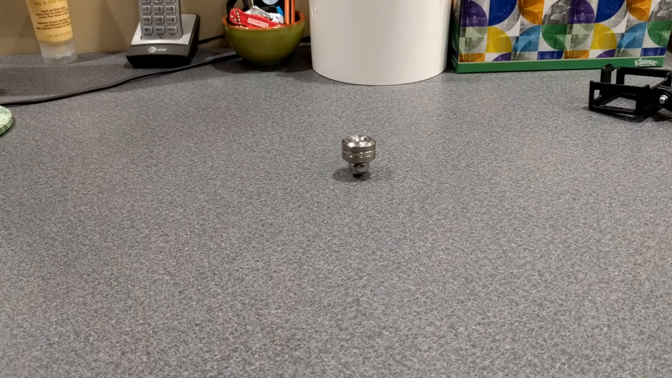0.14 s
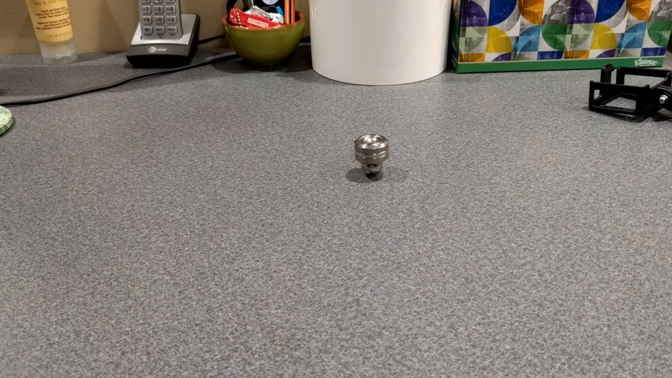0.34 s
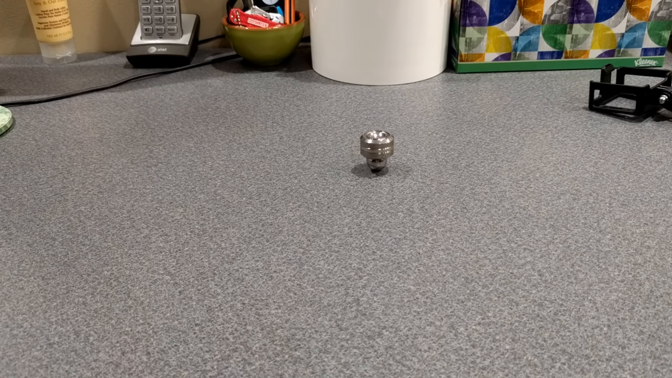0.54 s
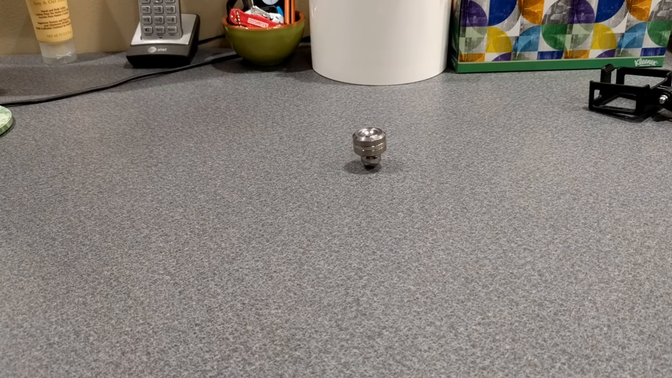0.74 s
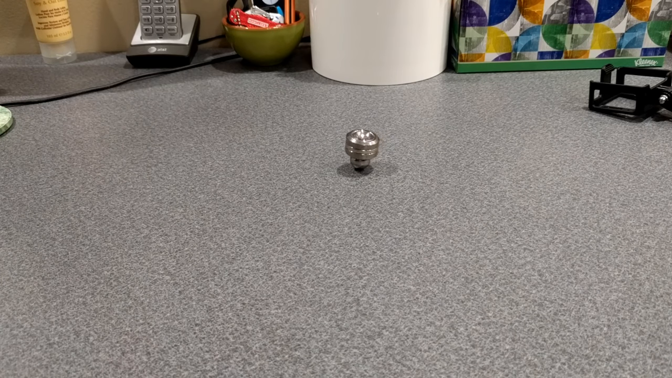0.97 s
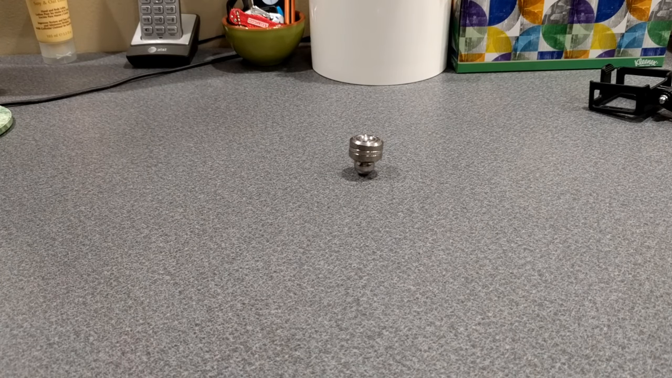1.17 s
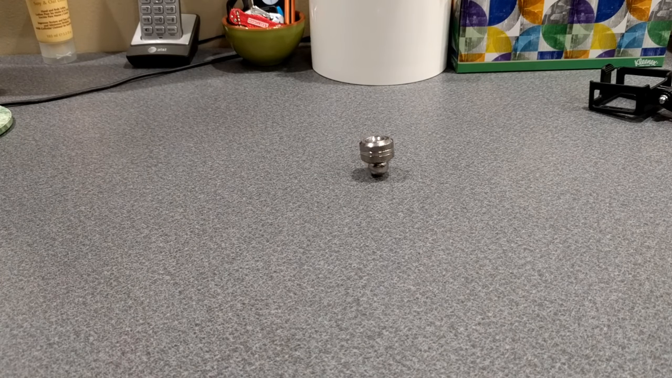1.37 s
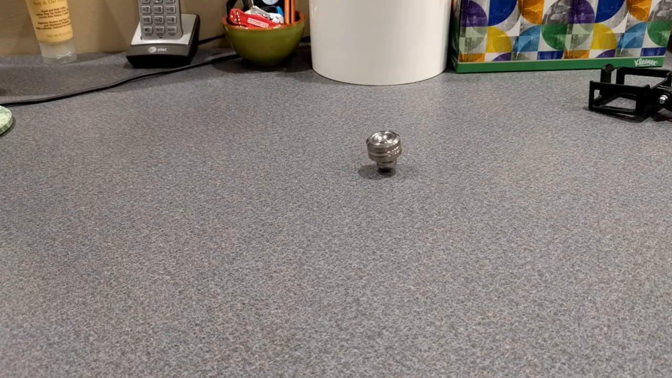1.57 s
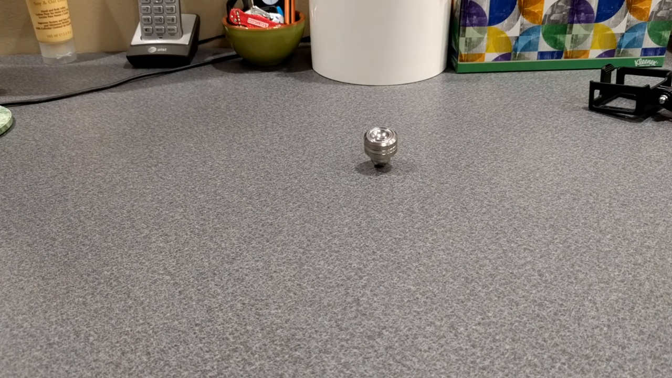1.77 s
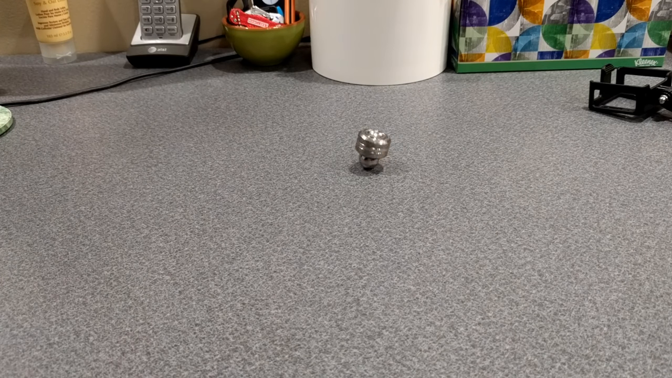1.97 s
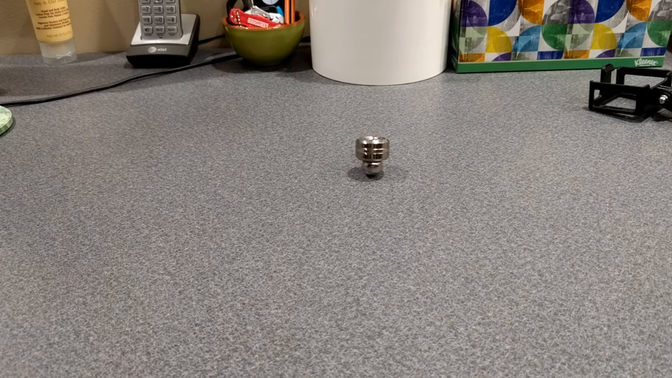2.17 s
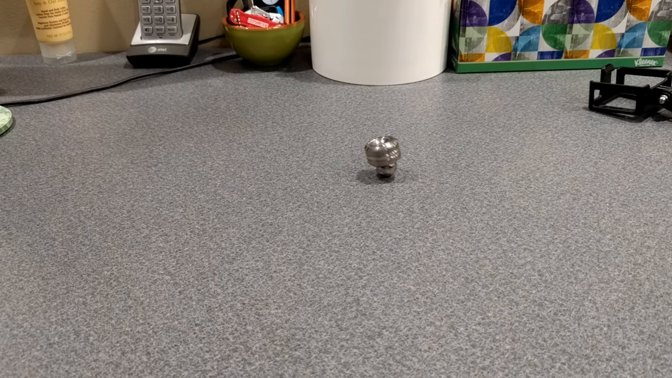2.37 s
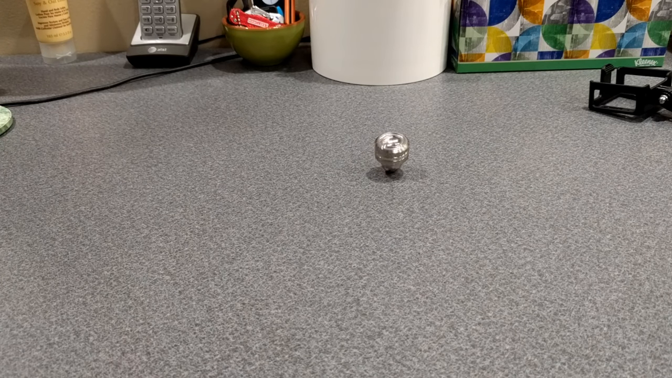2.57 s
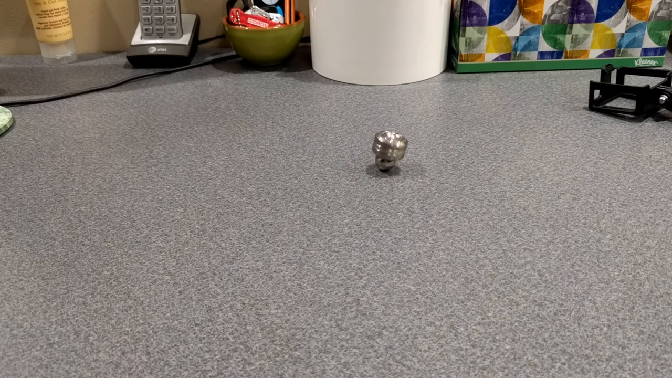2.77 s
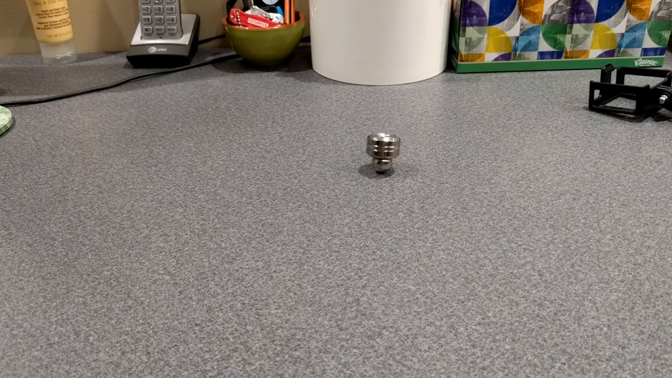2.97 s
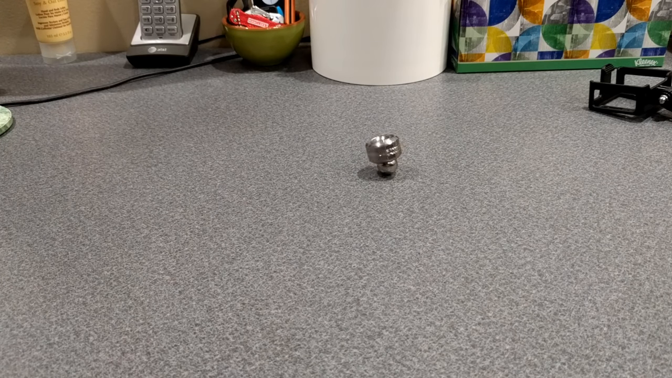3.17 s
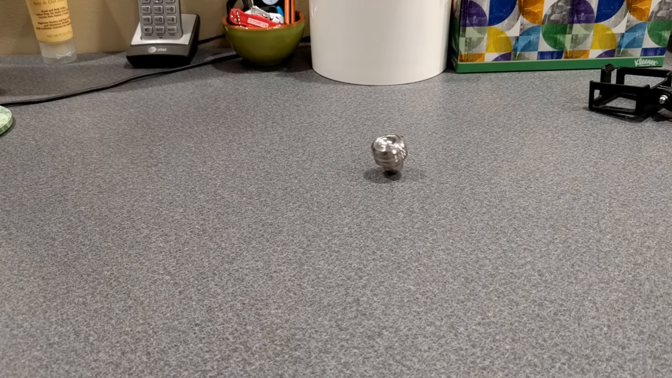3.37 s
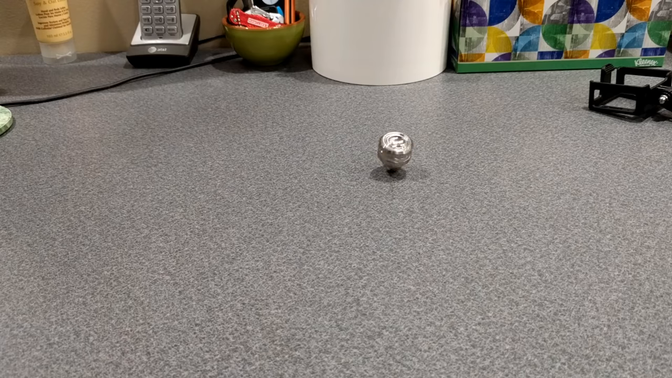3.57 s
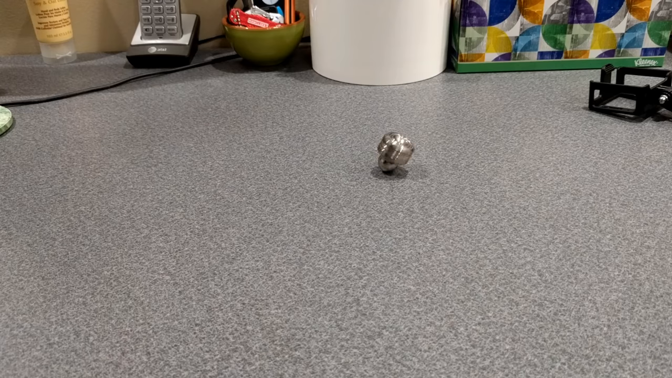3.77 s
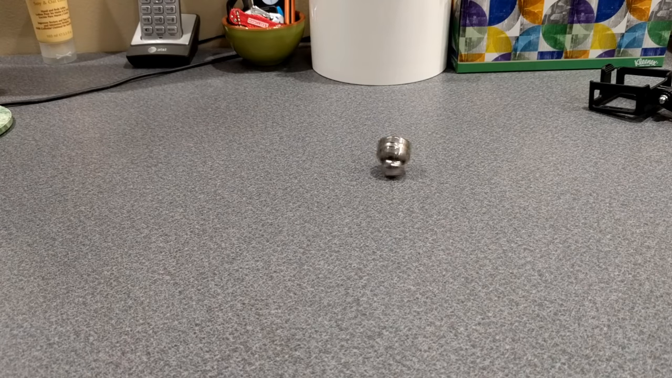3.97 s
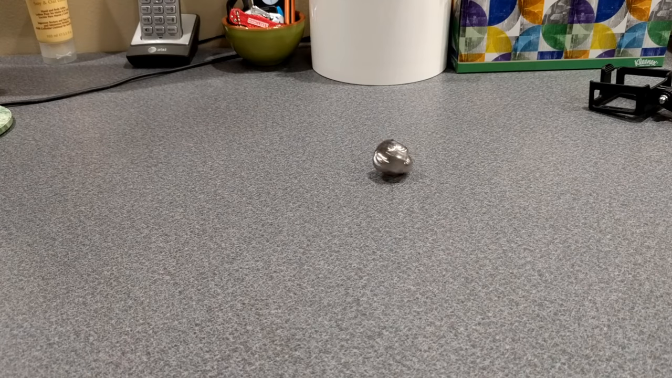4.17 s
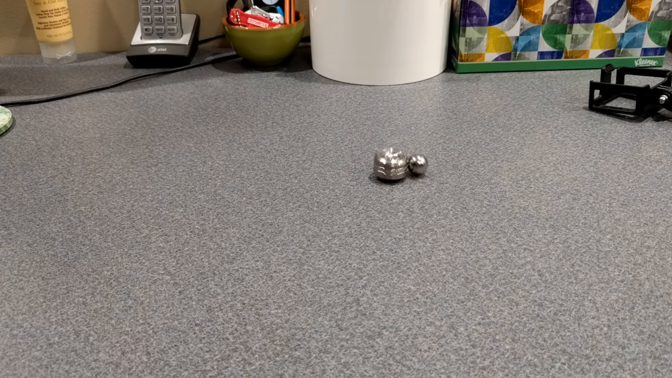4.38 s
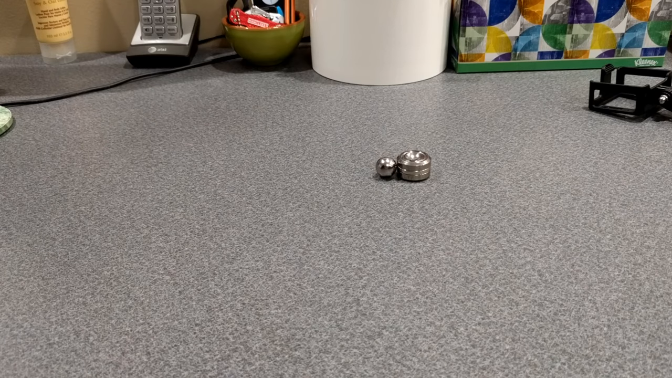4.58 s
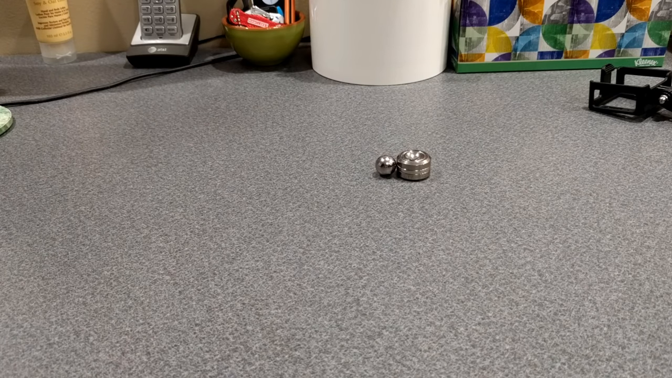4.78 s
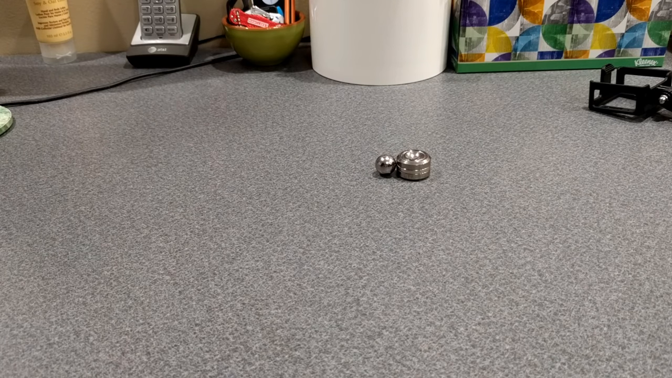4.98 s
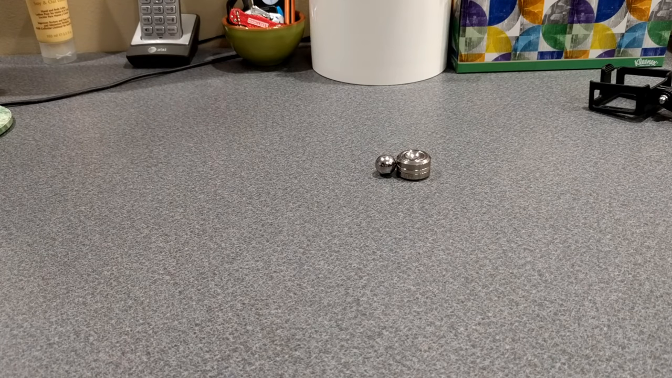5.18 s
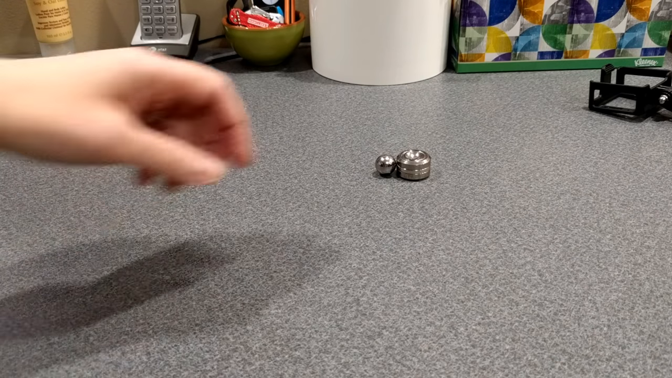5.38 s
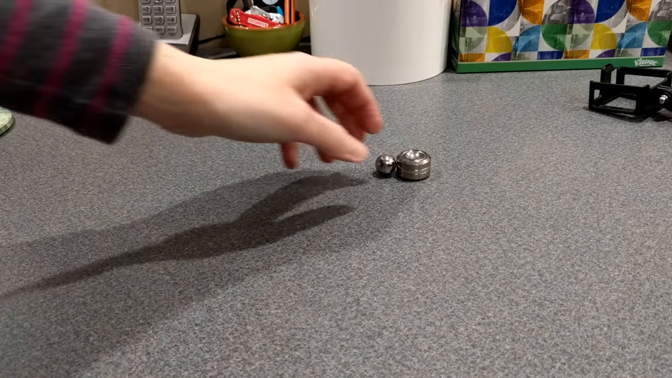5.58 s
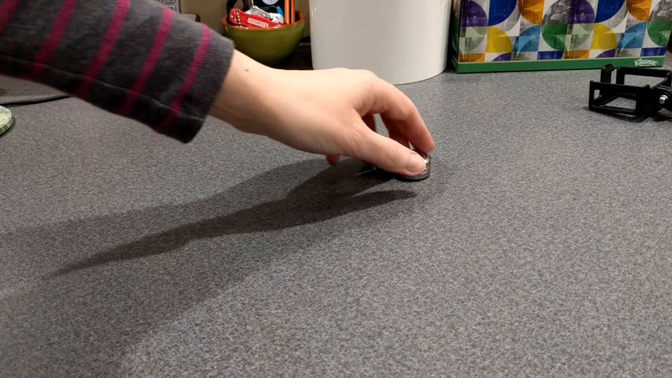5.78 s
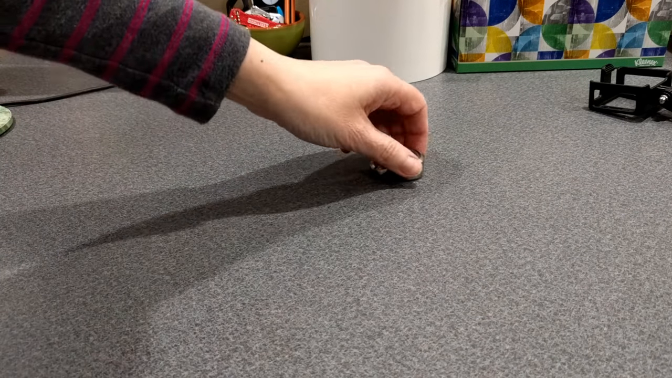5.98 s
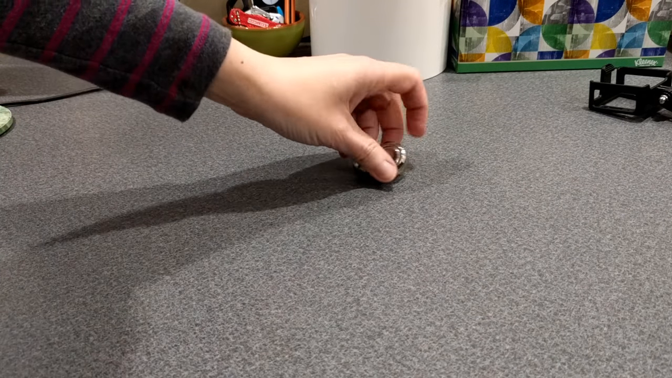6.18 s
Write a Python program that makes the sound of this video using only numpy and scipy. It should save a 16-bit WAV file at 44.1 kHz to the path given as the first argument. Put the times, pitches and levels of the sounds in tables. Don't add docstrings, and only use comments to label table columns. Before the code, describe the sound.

A quiet, dry kitchen with low fridge hum, soft hiss and very high, tiny electrical ticks throughout. From 0 seconds a small steel top spins on a laminate counter, barely audible: a faint grainy whirr swelling about five times a second. From about 2 seconds the wobble pulses grow, with small scratchy skids and occasional light metal clicks. By 3 to 3.7 seconds it is a clear rhythmic scrape, and from 3.8 it turns into a coarse, heavy rolling rattle. At about 4.26 it topples: very loud, sharp knocks on the counter with bright steel clacks, crowded together until 4.47, then a quick rocking rattle fading by 4.6. Only room tone remains until a brief soft sleeve rustle around 5.1 to 5.4. From 5.7 fingers touch the pieces with faint taps; between 5.95 and 6.2 come short scrapes, duller knocks and small metallic clicks as it is lifted.

```python
import sys
import numpy as np
from scipy import signal
from scipy.fft import rfft, irfft, next_fast_len
from scipy.io import wavfile

SR = 44100
rng = np.random.default_rng(int(sys.argv[2]) if len(sys.argv) > 2 else 0)


def to_wav(s):
    ch = np.atleast_2d(s).T
    pcm = np.round(np.clip(ch, -1, 1) * 32767)
    wavfile.write(sys.argv[1], SR, pcm.astype(np.int16))


def ratio_of_db(decibels):
    return 10 ** (np.asarray(decibels, float) / 20)


N = 274743
SIZE = next_fast_len(N + SR)
HZ = np.arange(SIZE // 2 + 1) * SR / SIZE + 1e-3
T_S = np.arange(N) / SR

# (frequency [Hz], density [dB per Hz])
AIR_SPECTRUM = [(20, -40), (50, -14.5), (90, -11.5), (170, -9.5), (300, -19), (600, -18.5), (2200, -28.5),
                (9800, -31.5)]
# (frequency [Hz], density [dB per Hz])
HISS_SPECTRUM = [(9800, -9.5), (11500, -2), (16000, -6)]
# (frequency [Hz], level [dB rms], width [Hz])
FRIDGE_LINES = [(59.2, -67, 2.5), (163.5, -70.5, 8.8), (306, -76, 3.6), (720, -81, 2.3), (1990, -79, 3.0),
                (2191, -82.5, 3.0), (2280, -84, 2.7)]
# (time [s], rate [ticks per s], level [dB])
TICK_TRAIN = [(0.0, 21.03, -49.5), (0.8, 21.03, -47), (1.0, 58, -51), (3.8, 57.5, -50), (4.3, 58, -56.5),
              (6.23, 58, -50)]
# (time [s], peak [dB])
LOUD_TICKS = [(0.044, -42.5), (0.0919, -45), (1.388, -44), (2.025, -45), (2.037, -42), (2.6887, -47),
              (3.7478, -42), (4.5587, -45)]
# (time [s], level [dB])
SLEEVE_RUSTLE = [
    (5.08, -84),
    (5.194, -64.5),
    (5.298, -64),
    (5.336, -88),
    (5.376, -80.5),
    (5.38, -75),
]
# (delay [s], gain [signed ratio])
EDGE_ECHOES = [(.00155, -0.37), (.0037, 0.4), (.0055, -.25), (.0070, -0.091)]
# (frequency [Hz], width [Hz], boost [dB], negative for the dip)
COUNTER_COLOUR = [(720, 150, 5), (944, 77, 13), (1222, 90, 8.5), (1315, 24, 5.5), (1628, 100, 3),
                  (1880, 41, 4), (2170, 120, 3.5), (2847, 230, 4.5), (3330, 150, 6), (3620, 150, -2.5),
                  (3950, 160, 6.5), (4558, 150, 4.5)]
# (frequency [Hz], width [Hz], level [dB])
SLAB_MODES = [(252, 680, -11), (425, 96, 3.5), (576, 84, 2.5), (665, 160, -3)]
# (frequency [Hz], width [Hz], level [dB])
CABINET_MODES = [(88, 60, -4.5), (138, 80, 0.5), (260, 77, -6)]
# (frequency [Hz], width [Hz], boost [dB])
CLACK_MODES = [(4980, 900, 12.5), (6105, 600, 4.5), (7960, 500, 7), (12600, 710, 6), (15500, 2800, 4.5)]
# (frequency [Hz], width [Hz], boost [dB])
CHATTER_MODES = [(2950, 200, 19.5), (3450, 250, 6), (4500, 440, 12.5), (6200, 500, 5)]
# (time [s], peak [dB])
CLACKS = [(2.025, -46), (2.031, -60), (2.034, -44), (2.037, -52), (2.04, -49), (2.045, -55), (3.747, -42),
          (3.76, -41), (3.792, -51), (4.259, -11.5), (4.2743, -11), (4.2853, -9.5), (4.2864, -4.5),
          (4.2875, -4), (4.2905, -16.5), (4.2962, -15), (4.308, -25.5), (4.3482, -33), (4.365, -34),
          (4.387, -36), (4.3905, -31.5), (4.422, -31.5), (4.46, -30), (5.975, -44), (5.988, -41),
          (6.116, -52), (6.134, -52), (6.156, -44)]
# (time [s], force [dB])
LEAN = [(0.0, -78), (1.6, -73), (2.9, -59.5), (3.6, -51.5), (3.78, -40.5), (3.795, -26), (3.83, -38),
        (3.885, -33), (3.945, -28.5), (3.975, -23.5), (4.003, -31.5), (4.055, -25.5), (4.07, -21),
        (4.115, -27), (4.13, -21.5), (4.2, -28), (4.22, -23), (4.25, -30)]
# (peak time [s], force [dB], length [s])
WOBBLES = [(0.043, -61, 0.38), (0.265, -56, 0.12), (0.424, -55.5, 0.15), (0.62, -51.5, 0.11),
           (0.78, -52, 0.11), (0.993, -59, 0.11), (1.163, -53, 0.12), (1.363, -54.5, 0.14),
           (1.531, -48.5, 0.082), (1.746, -51.5, 0.13), (1.941, -45.5, 0.1), (2.131, -45, 0.15),
           (2.326, -42.5, .12), (2.505, -41.5, 0.1), (2.708, -46, 0.13), (2.892, -44, 0.11),
           (3.12, -43, 0.15), (3.31, -45, 0.17), (3.506, -41, 0.17), (3.672, -42, 0.21)]
# (time [s], hardness [octaves])
ROLL_HARDNESS = [
    (0.0, 1.53),
    (1.8, 1.53),
    (2.4, 1.44),
    (3.6, 1.37),
    (3.9, 1.65),
    (4.25, 1.94),
]
# (time [s], peak [dB])
SKIDS = [(0.236, -40), (0.452, -44), (0.75, -40), (0.782, -50), (1.142, -41.5), (1.39, -46), (1.504, -39),
         (1.537, -46), (1.69, -39), (1.934, -39), (2.11, -33.5), (2.139, -45), (2.174, -40.5), (2.27, -40),
         (2.307, -44), (2.484, -34.5), (2.713, -29.5), (2.856, -37), (2.875, -33.5), (3.08, -32),
         (3.107, -28), (3.131, -30.5), (3.251, -37), (3.295, -41), (3.346, -31), (3.454, -37),
         (3.488, -30.5), (3.667, -26), (3.742, -30), (3.759, -24)]
# (time [s], peak [dB], hardness [octaves])
RIM_KNOCKS = [(4.2592, -3.5, 2.35), (4.2636, -8, 2.16), (4.2814, 3, 2.38), (4.2855, -13, 3),
              (4.2898, -7, 2.2), (4.3268, -4.5, 2.3), (4.3366, -15, 2.3), (4.3482, 4, 2.64),
              (4.365, 4, 2.64), (4.377, -15, 6.5), (4.387, 3, 2.78), (4.3903, -6, 4.7), (4.399, -3.5, 2.5),
              (4.405, -8.5, 4.5), (4.4085, -14.5, 1.6), (4.413, -30.5, 2.7), (4.418, -26, 4.2),
              (4.4223, -3, 2.8), (4.433, -13, 3), (4.445, -26, 4.1), (4.458, -14.5, 2.7),
              (4.466, -19, 2.25)]
# (time [s], force [dB], hardness [octaves])
ROCKING = [
    (4.27, -27, 1.9),
    (4.32, -30.5, 1.8),
    (4.401, -26.5, 3.1),
    (4.451, -25.5, 2.6),
    (4.49, -24.5, 2.19),
    (4.53, -35, 2.37),
    (4.57, -52.5, 2.5),
    (4.62, -70, 1.8),
    (4.68, -90, 1.6),
]
# (time [s], force [dB], hardness [octaves])
DRAG = [
    (5.7, -85, 2.3),
    (5.73, -69, 2.9),
    (5.785, -67, 1),
    (5.82, -51, 1.94),
    (5.935, -59, 1.9),
    (5.95, -38, 1.65),
    (6.05, -38, 1.4),
    (6.11, -46.5, 1.5),
    (6.195, -43, 1.04),
]
# (time [s], peak [dB], hardness [octaves])
NUDGES = [(5.721, -48.5, 3.1), (5.737, -57, 2.1), (5.8, -41, 1.4), (5.821, -36, 2), (5.946, -53, 1.4),
          (5.951, -39, 1.6), (5.967, -21.5, 1.2), (5.9794, -26.5, 3.1), (5.9833, -19.5, 1.03),
          (5.995, -29, 0.7), (6.0118, -28, 1.3), (6.032, -22, 1.3), (6.041, -34, 0.81), (6.106, -39, 1.5),
          (6.126, -19, 1.3), (6.133, -25.5, 1.2), (6.1353, -12.5, 2.0), (6.139, -35, 3.3),
          (6.157, -20, 2.1), (6.188, -72, 0.81), (6.191, -26.5, 0.92)]

SOFTEST_HZ = 500
HARDNESS_OCTAVES = np.arange(0, 3.6, .5)


def unit_rms(x):
    return x / np.sqrt(np.mean(x ** 2) + 1e-20)


def in_time(rows):
    s, *columns = np.transpose(rows)
    return [np.interp(T_S, s, c) for c in columns]


def sample_at(rows):
    return (np.array(rows)[:, 0] * SR).astype(int)


def through(x, response):
    return irfft(rfft(x, SIZE) * response, SIZE)[:N]


def noise_through(response):
    return unit_rms(through(rng.standard_normal(N), response))


def clicks(rows):
    out = np.zeros(N)
    np.add.at(out, sample_at(rows), ratio_of_db(np.array(rows)[:, 1]))
    return out


def burst(rows, rise_s, fall_s):
    swell = clicks(rows) + 1e-18
    for s in rise_s, fall_s:
        keep = np.exp(-1 / (s * SR))
        swell = signal.lfilter([1 - keep], [1, -keep], swell)
    return swell * (rise_s + fall_s) * SR


def resonances(modes):
    out = 1
    for hz, width_hz, boost_db in modes:
        damp = 1j * HZ * width_hz
        stiff = hz ** 2 - HZ ** 2
        out = out * (stiff + damp * ratio_of_db(boost_db)) / (stiff + damp)
    return out


def low_pass(hz):
    s = 1j * HZ / hz
    return 1 / ((1 + .77 * s + s * s) * (1 + 1.85 * s + s * s))


def room_tone(split_hz):
    air_db, hiss_db, wander_db = -60.5, -66.5, 1.0
    spectra = []
    for table in AIR_SPECTRUM, HISS_SPECTRUM:
        hz, db = np.transpose(table)
        spectra.append(ratio_of_db(np.interp(np.log(HZ), np.log(hz), db)))
    air = noise_through(spectra[0] * (HZ < split_hz))
    hiss = noise_through(spectra[1] * (HZ >= split_hz) * (HZ < 16000))
    wander = noise_through(1 / (1 + HZ ** 2))
    hum = 0
    for hz, db, width_hz in FRIDGE_LINES:
        hum = hum + ratio_of_db(db) * noise_through(1 / (1 + (2 * (HZ - hz) / width_hz) ** 2))
    return ratio_of_db(air_db) * air + ratio_of_db(hiss_db + wander_db * wander) * hiss + hum


def ticks(low_hz):
    first_s, spread_db, jitter_s = .0345, 2, 0.0024
    per_s, db = in_time(TICK_TRAIN)
    turns = np.cumsum(per_s) / SR - first_s * per_s[0]
    at = np.flatnonzero(np.diff(np.floor(turns)))
    late, loud = rng.standard_normal((len(at), 2)).T
    jittered = at / SR > TICK_TRAIN[1][0]
    s = np.clip(at / SR + jitter_s * late * jittered, 0, (N - 1) / SR)
    rows = list(zip(s, db[at] + spread_db * loud)) + list(LOUD_TICKS)
    band = signal.butter(4, [low_hz, 15700], "band", fs=SR, output="sos")
    return ratio_of_db(3.0) * signal.sosfilt(band, burst(rows, .0002, 0.00059) * rng.standard_normal(N))


def sleeve():
    band = signal.butter(2, [2400, 10000], "band", fs=SR, output="sos")
    before, after = (SLEEVE_RUSTLE[0][0] - .02, -110), (SLEEVE_RUSTLE[-1][0] + .02, -110)
    level_db = in_time([before] + list(SLEEVE_RUSTLE) + [after])[0]
    return ratio_of_db(level_db) * unit_rms(signal.sosfilt(band, rng.standard_normal(N)))


def kitchen(near_t60_s, near_db, near_hz, t60_s, wet_db, dull_hz):
    t = np.arange(SR) / SR
    tails = []
    for decay_s, start_s in (near_t60_s, .001), (t60_s, .008):
        tail = rng.standard_normal(SR) * ratio_of_db(-60 * t / decay_s) * np.clip(t / start_s - 1, 0, 1)
        tails.append(rfft(tail / np.sqrt(np.sum(tail ** 2)), SIZE) / (1 + 1j * HZ / dull_hz))
    s = 1j * HZ / near_hz
    return 1 + ratio_of_db(near_db) * tails[0] * (s / (1 + s)) ** 2 + ratio_of_db(wet_db) * tails[1]


def echoes():
    return 1 + sum(gain * np.exp(-2j * np.pi * HZ * s) for s, gain in EDGE_ECHOES)


def counter(blows, grains, hardness, cut_hz):
    board = resonances(COUNTER_COLOUR) * low_pass(cut_hz) * echoes()
    out = 0
    for octave in HARDNESS_OCTAVES:
        s = 1j * HZ / (SOFTEST_HZ * 2 ** octave)
        response = -s ** 3 / (1 + s) ** 8 * board
        pulse = irfft(response, SIZE)
        share = np.clip(1 - 2 * np.abs(hardness - octave), 0, 1)
        force = blows / np.max(np.abs(pulse)) + grains / np.sqrt(np.sum(pulse ** 2))
        out = out + rfft(share * force, SIZE) * response
    return out


def slab(force, modes):
    response = 0
    for k, (hz, width_hz, db) in enumerate(modes):
        damp = 1j * HZ * width_hz
        response = response + (-1) ** k * ratio_of_db(db) * damp / (hz ** 2 - HZ ** 2 + damp)
    return rfft(force, SIZE) * response / np.sqrt(np.sum(irfft(response, SIZE) ** 2))


def steel(splash, modes, low_hz, high_hz):
    s = 1j * HZ / low_hz
    response = (s / (1 + s)) ** 2 / (1 + 1j * HZ / high_hz) ** 2 * resonances(modes)
    return rfft(splash, SIZE) * response / np.max(np.abs(irfft(response, SIZE)))


def clacks():
    splash = ratio_of_db(-18.0) * burst(CLACKS, 0.00017, 0.00031)
    sizzle = ratio_of_db(-45.5) * burst(RIM_KNOCKS, .0003, 0.01)
    force = clicks(CLACKS) + (splash + sizzle) * rng.standard_normal(N)
    return steel(force, CLACK_MODES, low_hz=3500, high_hz=19000)


def spin():
    rise_share, drop_db, squareness = 0.48, 14, 1.68
    power = ratio_of_db(2 * in_time(LEAN)[0])
    for s, db, length_s in WOBBLES:
        half_s = length_s * np.where(T_S < s, rise_share, 1 - rise_share)
        away = np.minimum(np.abs(T_S - s) / half_s, 5)
        power = power + ratio_of_db(2 * (db - drop_db * away ** squareness))
    return 10 * np.log10(power)


def contact():
    rumble_ref_db, follows, ceiling_db = -46.5, 0.82, -39
    side_db, held_db = -3, -10
    late_db, late_hardness = in_time(list(ROCKING) + list(DRAG))
    spinning = T_S < LEAN[-1][0]
    hardness = np.where(spinning, in_time(ROLL_HARDNESS)[0], late_hardness)
    force_db = np.where(spinning, spin(), late_db)
    free_db = rumble_ref_db + follows * (force_db + 45.5)
    rumble_db = -10 * np.log10(ratio_of_db(-2 * free_db) + ratio_of_db(-2 * ceiling_db))
    rumble_db = rumble_db + side_db * ~spinning + held_db * (T_S > DRAG[0][0])
    return force_db, rumble_db, hardness


def small_skids(force_db):
    per_s, above_db, spread_db = 37, -0.5, 6.5
    gap, size = rng.random((200, 2)).T
    s = np.cumsum((.4 + 1.2 * gap) / per_s)
    at = np.minimum(s * SR, N - 1).astype(int)
    db = force_db[at] + above_db + spread_db * (4 * size - 2)
    return [row for row in zip(s, db) if row[0] < SKIDS[-1][0]]


def top(per_s, uneven_db, spread_octaves, thud_db):
    rattle_db, rumble_db, hardness = contact()

    size_db = uneven_db * np.minimum(rng.exponential(1, N), 4)
    crowd = ratio_of_db(.4 * np.clip(rattle_db + 40.5, 0, 25))
    born = (rng.random(N) < crowd * per_s / SR) * rng.choice([-1, 1], N)
    grains = unit_rms(born * ratio_of_db(size_db) / np.sqrt(crowd))
    harder = spread_octaves * (rng.exponential(1, N) - 1) * (born != 0)
    grains = grains * ratio_of_db(-7.0 * harder)

    hardness = hardness + harder
    struck = list(RIM_KNOCKS) + list(NUDGES)
    hardness[sample_at(struck)] = np.array(struck)[:, 2]
    hardness = np.clip(hardness, 0, HARDNESS_OCTAVES[-1])

    skids = list(SKIDS) + small_skids(rattle_db)
    scrape = ratio_of_db(-11.5) * burst(SKIDS, 0.00054, 0.0029) + ratio_of_db(-9.5) * burst(NUDGES, 0.00044, 0.0038)
    knocks = clicks(RIM_KNOCKS)
    blows = ratio_of_db(0.44) * clicks(skids) + knocks + ratio_of_db(-7.5) * clicks(NUDGES)
    rattle = counter(blows, (ratio_of_db(rattle_db - 2.5) + scrape) * grains, hardness, cut_hz=3210)

    rumble = slab(ratio_of_db(rumble_db + 0.5) * grains, SLAB_MODES)
    thud = slab(ratio_of_db(thud_db) * knocks + ratio_of_db(0.73 * rumble_db - 27.0) * grains, CABINET_MODES)
    chatter = steel(ratio_of_db(1.376 * rattle_db - 22.5) * grains, CHATTER_MODES, low_hz=2510, high_hz=2800)
    return rattle + rumble + thud + chatter


def scene():
    contacts = top(per_s=2200, uneven_db=3.0, spread_octaves=0.36, thud_db=-15) + clacks()
    room = kitchen(near_t60_s=0.021, near_db=-2.5, near_hz=1797, t60_s=0.15, wet_db=-8.5, dull_hz=8000)
    heard = irfft(contacts * room, SIZE)[:N]
    return (heard + ticks(low_hz=10000) + sleeve() + room_tone(split_hz=9800))[None]


def top_cut(x):
    return signal.sosfilt(signal.butter(12, 16820, fs=SR, output="sos"), x)


def record(dry):
    offset = -.0008
    treble_cut = signal.ellip(10, .5, 60, 16250, fs=SR, output="sos")
    flat = dry / (1 + dry ** 12) ** (1 / 12)
    return top_cut(signal.sosfilt(treble_cut, flat) + offset)


dry = scene()
out = record(dry)
to_wav(out)
```